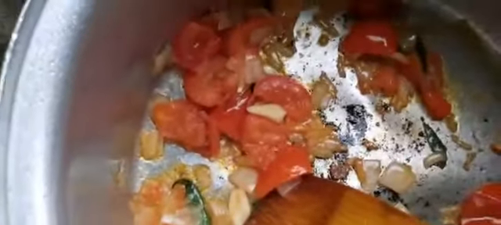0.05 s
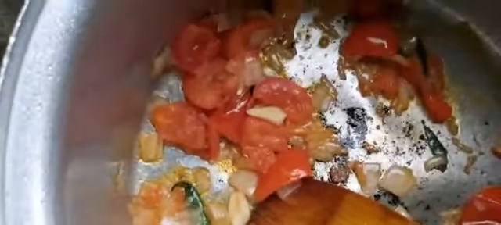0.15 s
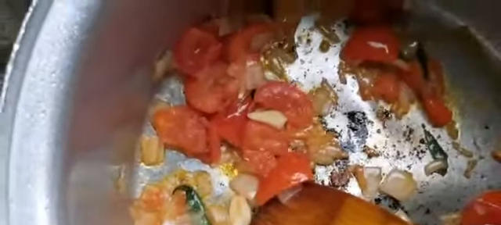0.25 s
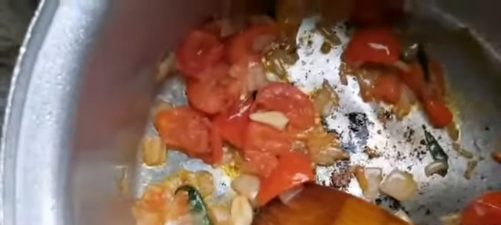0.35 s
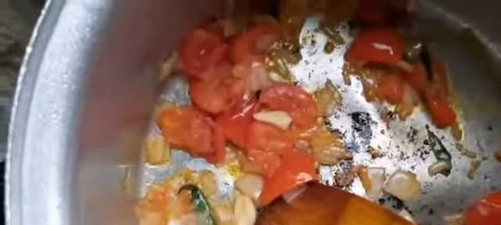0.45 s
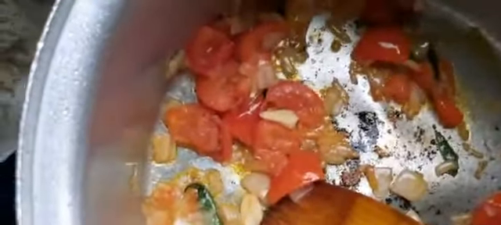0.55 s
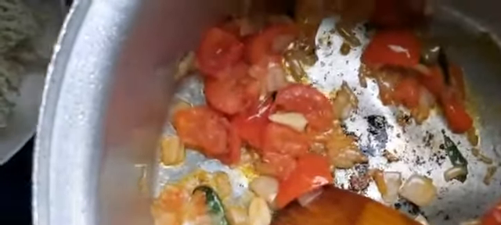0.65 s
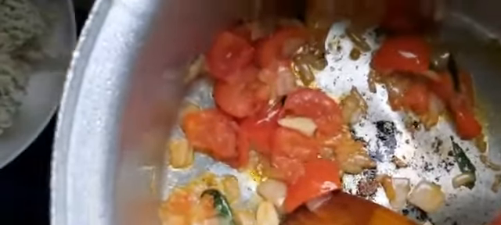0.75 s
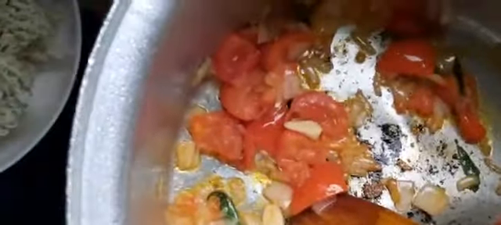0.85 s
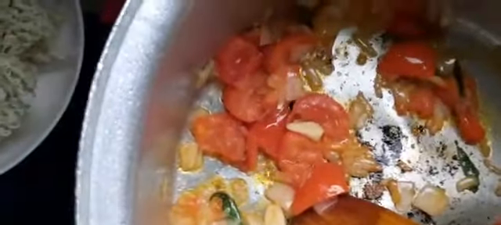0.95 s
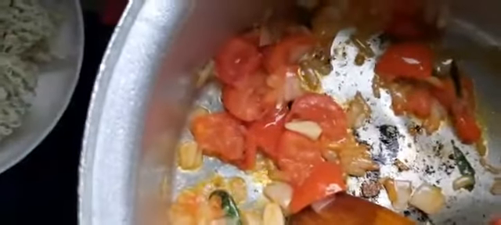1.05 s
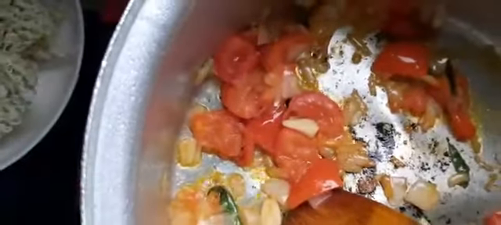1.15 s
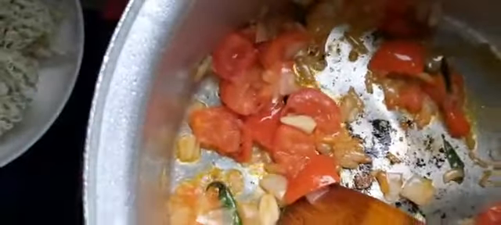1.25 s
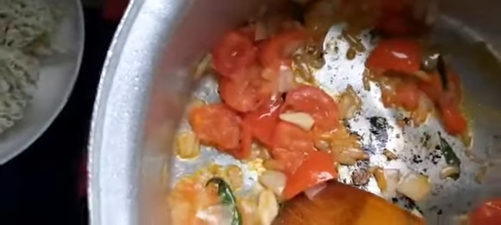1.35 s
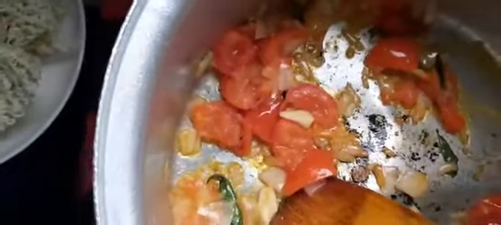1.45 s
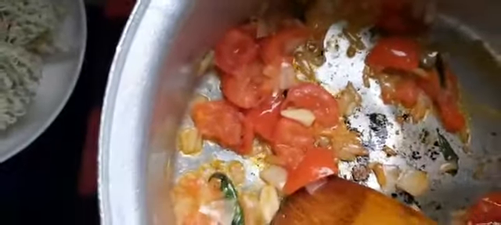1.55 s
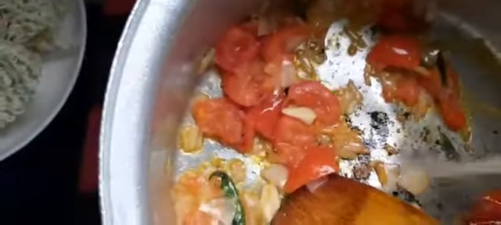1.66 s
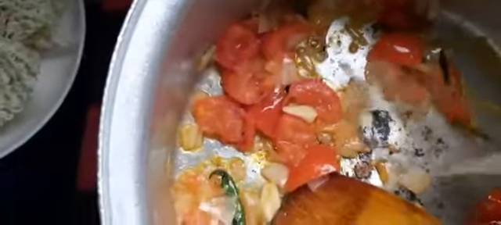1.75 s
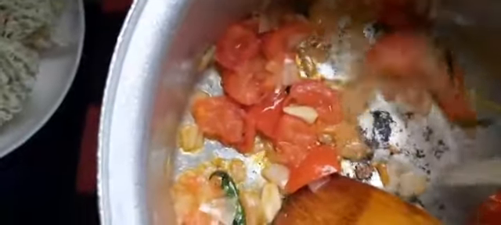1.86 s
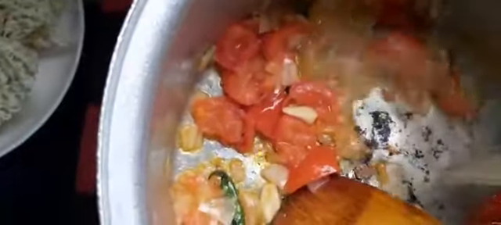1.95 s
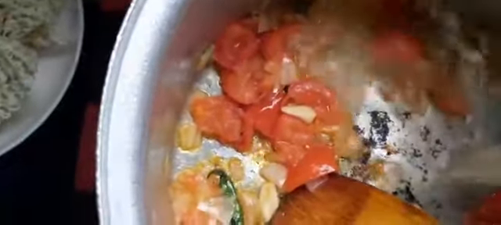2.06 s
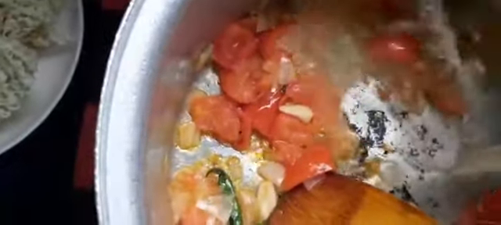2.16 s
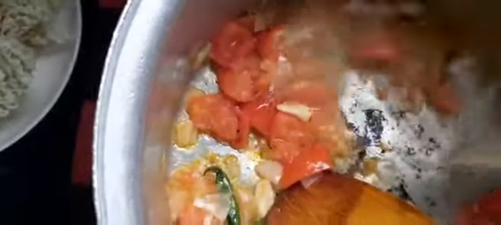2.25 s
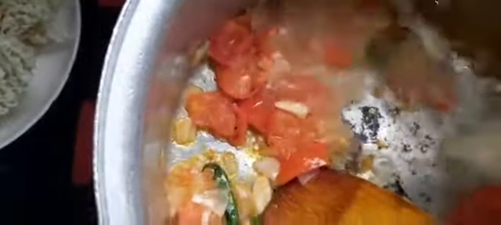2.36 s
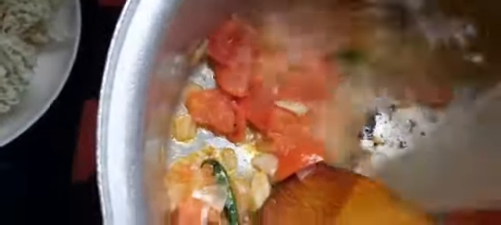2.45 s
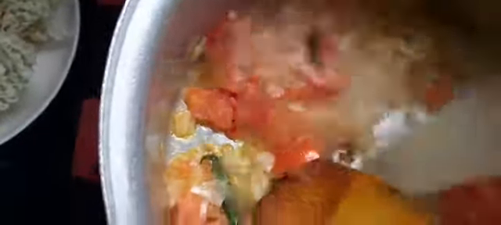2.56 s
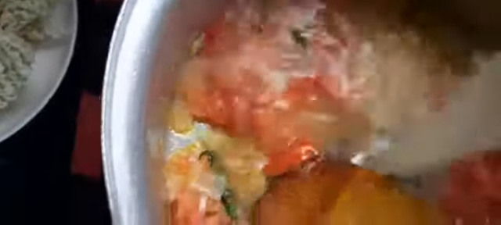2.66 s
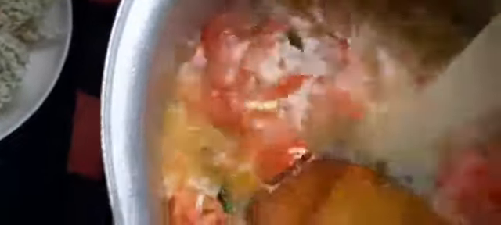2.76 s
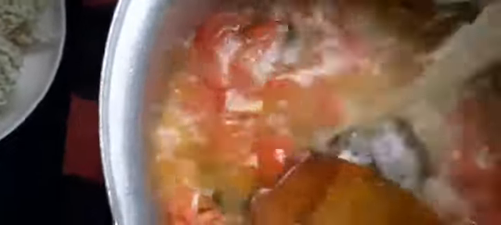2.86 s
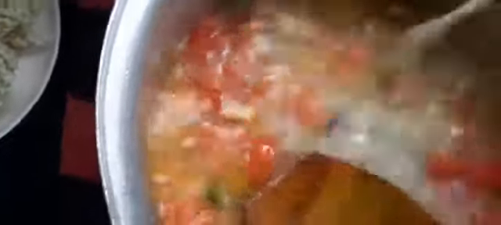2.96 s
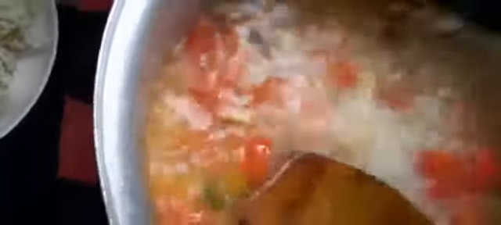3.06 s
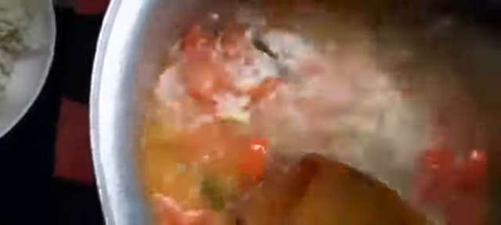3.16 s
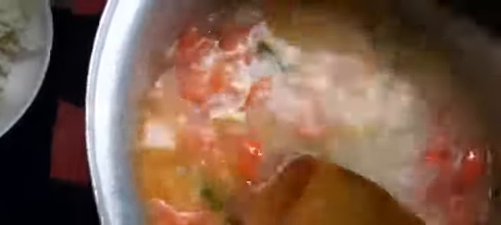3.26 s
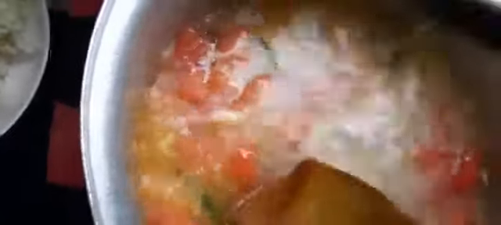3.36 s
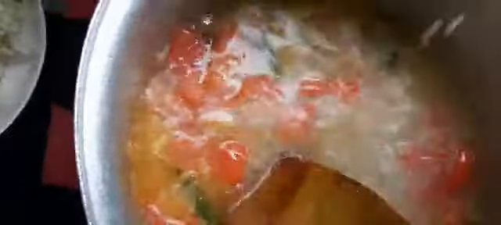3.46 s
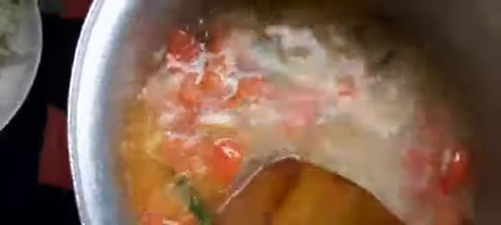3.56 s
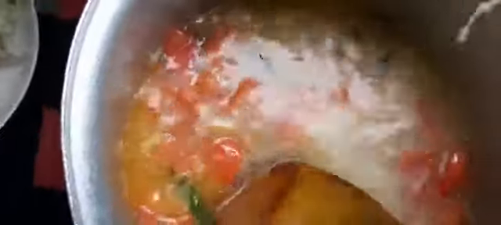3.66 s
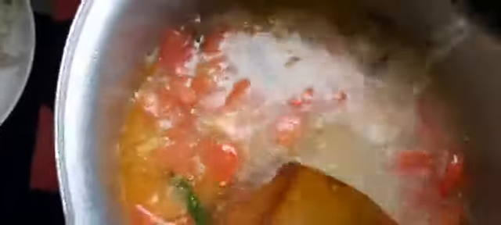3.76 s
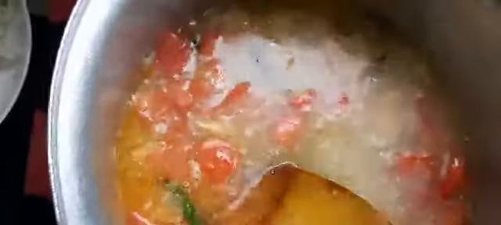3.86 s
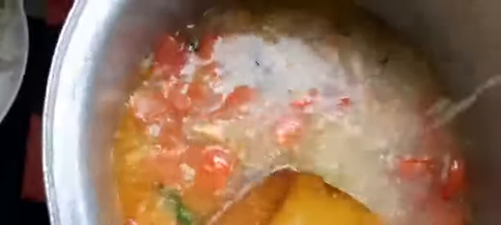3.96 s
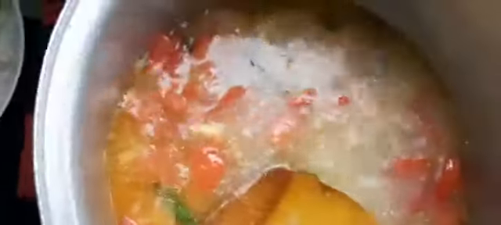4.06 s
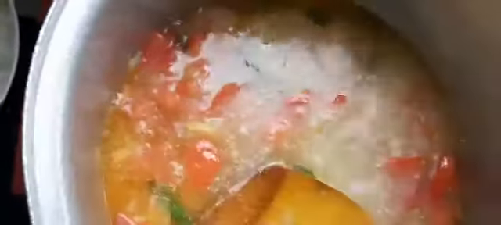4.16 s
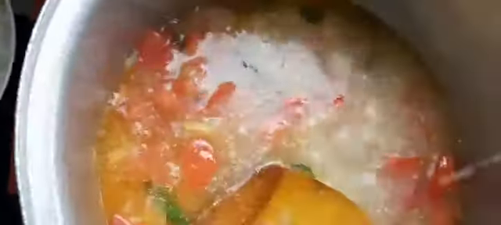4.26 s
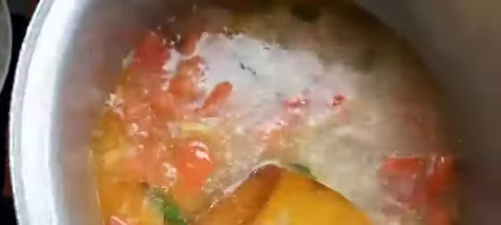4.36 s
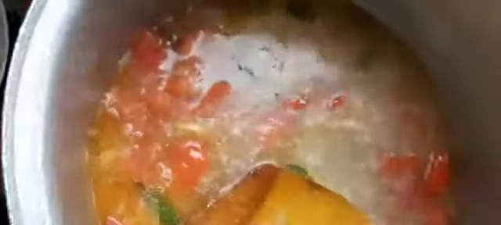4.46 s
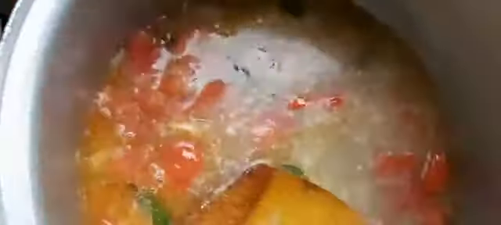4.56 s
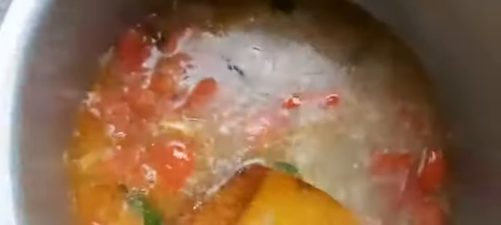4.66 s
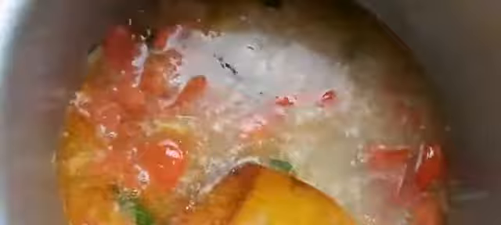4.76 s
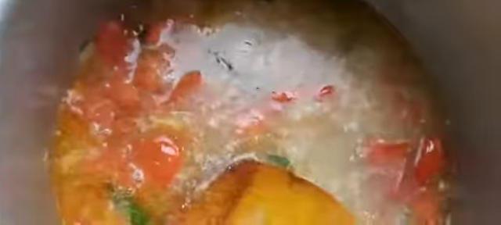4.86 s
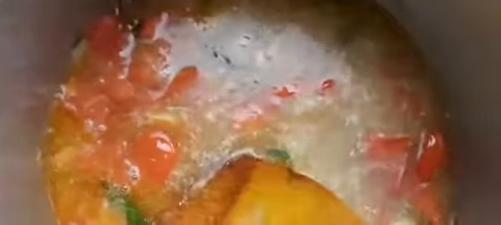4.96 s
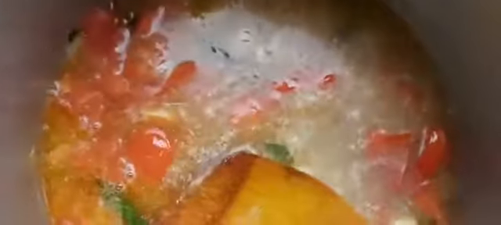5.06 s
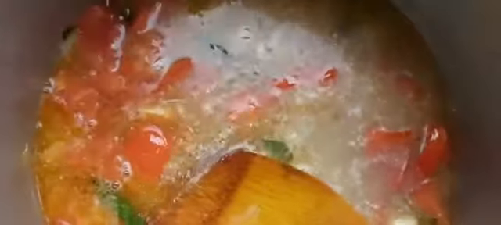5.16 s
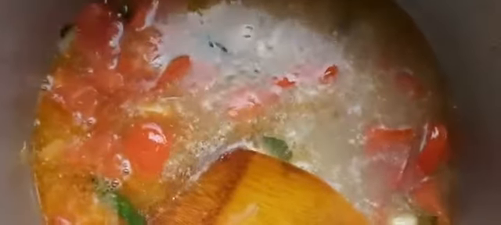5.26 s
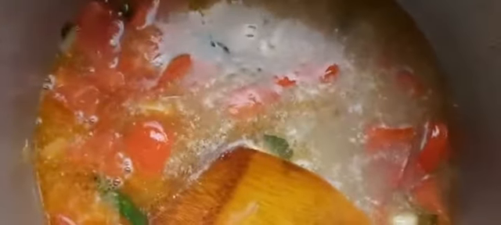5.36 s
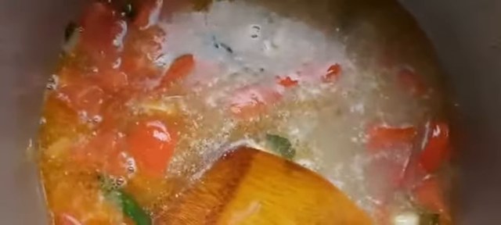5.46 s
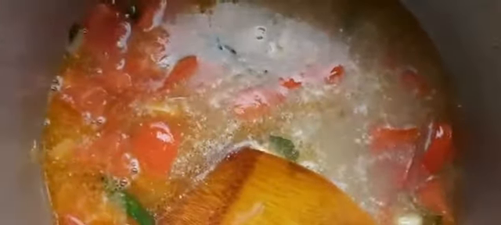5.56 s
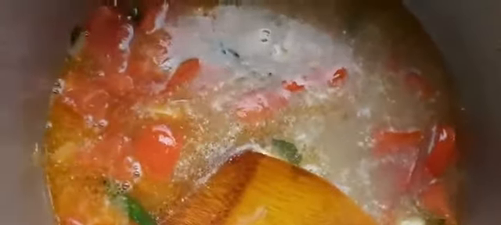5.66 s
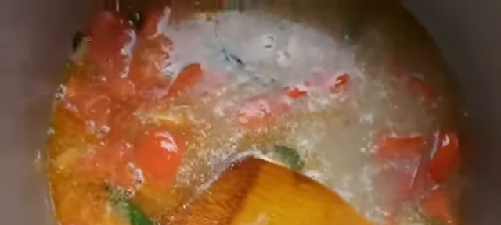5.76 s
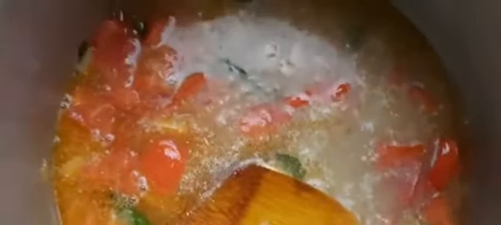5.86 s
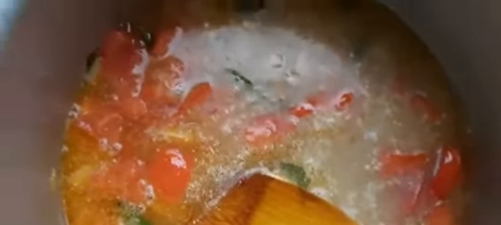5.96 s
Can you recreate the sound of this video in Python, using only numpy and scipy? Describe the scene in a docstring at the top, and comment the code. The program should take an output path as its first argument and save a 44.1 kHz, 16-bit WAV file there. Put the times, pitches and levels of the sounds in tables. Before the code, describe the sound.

Tomatoes and onions sizzle and crackle in a metal pot, then water splashes in with a hissing burst, gurgles, and falls nearly silent before a knock.

```python
"""Tomatoes and onions fry in oil in a metal pot, close to the microphone in a quiet kitchen.
Sizzle is thousands of tiny vapour bursts mixed with smooth steam noise; loud drops crack above it.
The first water flashes to steam with a thump; the pour, made of ringing bubbles and air pockets, splashes
and gurgles until it drowns the sizzle. A few last drops tick and steam squeaks on gliding tones;
the pot slips twice with a short groan and rings with a firm knock at the end."""
import sys
import numpy as np
from scipy import signal
from scipy.fft import rfft, irfft
from scipy.io import wavfile

SR = 44100
rng = np.random.default_rng(int(sys.argv[2]) if len(sys.argv) > 2 else 0)


def dump_mix(stems):
    """Bounce the given channels to the path in sys.argv[1] as a 16-bit WAV at rate SR."""
    frames = np.atleast_2d(stems).T  # one column per channel
    limited = np.clip(frames, -1, 1)  # hard clip at full scale
    pcm = np.round(limited * 32767).astype(np.int16)
    wavfile.write(sys.argv[1], SR, pcm)


N = 265526
TIME = np.arange(N) / SR  # seconds

# base level of the oil sizzle in dB, before the final balance
FRY_DB = -28
# seconds: the water drowns the bottom as the pour tails off; the lesser spits end
DROWN_S, SPITS_END_S = 2.78, 3.6
THUMP_S = 1.718  # the first water lands
# vapour bursts per second at frying strength, before they follow the vigour
BURSTS_PER_S = 4400
# which side is louder, left minus right in dB
OIL_LEFT_DB = 2.8


def from_db(db):
    """Turn decibels into a gain."""
    return 10 ** (np.asarray(db) / 20)


def power_sum(*levels_db):
    """Level in dB of unrelated sounds together: their powers add."""
    return 10 * np.log10(sum(from_db(db) ** 2 for db in levels_db) + 1e-20)


def rms_one(x):
    """Scale a sound to an rms of 1."""
    return x / np.sqrt(np.mean(x ** 2) + 1e-20)


def at_hz(points, hz):
    """Read a curve of (Hz, value) points along a log-frequency axis."""
    f, value = np.transpose(points)
    return np.interp(np.log(np.maximum(hz, 1)), np.log(f), value)


def pan(left_db):
    """Gains of left and right that differ by left_db."""
    return from_db(np.array([[left_db], [-left_db]]) / 2)


def add(out, s, sound):
    """Mix a short sound in at time s."""
    i = int(np.clip(round(s * SR), 0, N - 1))
    out[:, i:i + sound.shape[-1]] += sound[..., :N - i]


def drift(rate):
    """Smoothed noise with an rms of 1; a higher rate makes it wander faster."""
    step = 40  # samples between the values that are drawn
    r = np.exp(-2 * step * np.pi * rate / SR)
    noise = rng.standard_normal(N // step + 2002)
    slow = signal.lfilter([1], [1, -2 * r, r * r], noise)[2000:]
    return np.interp(np.arange(N) / step, np.arange(len(slow)), rms_one(slow))


def colour(x, spectrum, size=2048):
    """Filter to the given spectrum with unit power gain; minimum phase, so nothing sounds early."""
    bins_hz = np.arange(size // 2 + 1) * SR / size
    cepstrum = irfft(np.log(from_db(at_hz(spectrum, bins_hz))))
    cepstrum[1:size // 2] *= 2
    cepstrum[size // 2 + 1:] = 0
    kernel = irfft(np.exp(rfft(cepstrum)))
    return signal.oaconvolve(x, kernel[None] / np.linalg.norm(kernel), axes=1)[:, :N]


def resonate(x, hz, width_hz):
    """One resonance with gain 1 at its peak; a narrow one rings longer."""
    r = np.exp(-np.pi * width_hz / SR)
    top = np.array([1, 0, -1]) * (1 - r * r) / 2
    bottom = [1, -2 * r * np.cos(2 * np.pi * hz / SR), r * r]
    return signal.lfilter(top, bottom, x + 1e-18)


def pot_air(x, modes, low_hz, high_hz):
    """A group of air resonances, limited to a band of pitches; rms 1."""
    rings = 0
    for k, (hz, width, db) in enumerate(modes):
        rings = rings + (-1) ** k * from_db(db) * resonate(x, hz, width)
    band = signal.butter(2, [low_hz, high_hz], "band", fs=SR, output="sos")
    return rms_one(signal.sosfilt(band, rings))


def blend(x, likeness):
    """Make two unrelated channels alike (1), unrelated (0) or opposite (-1)."""
    c = np.clip(likeness, -1, 1)
    mid = np.sqrt(1 + c) * (x[0] + x[1]) / 2
    side = np.sqrt(1 - c) * (x[0] - x[1]) / 2
    return np.array([mid + side, mid - side])


def pot_walls(x, t60, wall_db, size=4096):
    """Dense, dying reflections between the walls of pot or kitchen, different in each channel."""
    t = np.arange(size) / SR
    echoes = rng.standard_normal((2, size)) * from_db(-60 * t / t60) * (t > .0006)
    echoes *= from_db(wall_db) / np.linalg.norm(echoes, axis=1, keepdims=True)
    return x + signal.oaconvolve(x, echoes, axes=1)[:, :N]


def bend(x, octaves):
    """Shift the pitch of a steady sound along a curve by reading it faster or slower."""
    where = np.cumsum(2 ** np.clip(octaves, -.5, .5)) % (N - 1)
    return np.array([np.interp(where, np.arange(N), channel) for channel in x])


def ebb(held_db, sag_s, sag_db_per_s, fall_db_per_s, remnant_db, fade_db_per_s):
    """A level holds, sags as the water deepens, then falls fast to a slowly fading remnant."""
    drowned = np.maximum(TIME - DROWN_S, 0)
    main_db = held_db - sag_db_per_s * np.maximum(TIME - sag_s, 0) - fall_db_per_s * drowned
    return power_sum(main_db, remnant_db - fade_db_per_s * drowned)


def swell(s, rise, t60):
    """A straight rise to 0 dB, then a steady decay of 60 dB per t60; in dB."""
    t = TIME - s
    return 20 * np.log10(np.clip(t / rise, 1e-9, 1)) - 60 * np.maximum(t - rise, 0) / t60


def swells(rows):
    """The two level curves in dB of a table of swells."""
    curves = []
    for s, rise, t60, *levels_db in rows:
        curves.append(swell(s, rise, t60) + np.array(levels_db)[:, None])
    return power_sum(*curves)


def chance(per_s):
    """Sample numbers of events that come at random at the given rate."""
    return np.flatnonzero(rng.random(N) < per_s / SR)


def random_clicks(happens, spread_db, cap):
    """Single-sample clicks of uneven size and random sign wherever an event happens."""
    sizes = from_db(spread_db * np.minimum(rng.exponential(1, N), cap))
    return sizes * rng.choice([-1, 1], N) * happens


def bursts(per_s, spread_db, width_hz, count=20, size=4):
    """Tiny vapour bursts; each spot has its pitch and stereo lag, each of four groups its echoes."""
    happens = rng.random(N) < per_s * from_db(2.0 * drift(25)) / SR
    clicks = random_clicks(happens, spread_db, cap=4.5) / np.sqrt(per_s)
    spot = rng.integers(0, count, N)
    quarters = np.zeros((size, 2, N))
    for k, hz in enumerate(np.linspace(700, 15500, count)):
        snap = resonate(clicks * (spot == k), hz, width_hz)
        lagged = np.roll(snap, rng.integers(-9, 10))
        quarters[k % size] += pan(rng.normal(0, 2.0)) * [snap, lagged]
    return rms_one(sum(pot_walls(quarter, t60=0.027, wall_db=-3.5) for quarter in quarters))


def sizzle(crackle, fizz, oil_db, fizz_db, flash_db, boil_db, steam_db):
    """Oil crackles on dry patches, water flashes off metal and fizzes below; smooth steam runs through."""
    # Each row of these four spectra: pitch in Hz, level in dB per Hz.
    # They colour the frying in oil, the fizz under water, the flash of steam and the boiling water.
    oil_sizzle = [(1800, -36.5), (2500, -10), (3300, -12), (4200, -3.5), (5200, -3), (6400, -2.5),
                  (8000, -3), (9900, -7.5), (11400, -1), (12700, 0.5), (14500, -2.5), (16000, -2.5)]
    wet_sizzle = [(1800, -30), (2600, -3.5), (3400, -1), (4800, -1), (6400, -4), (7500, -4.5),
                  (9900, -10.5), (11300, -6), (12600, -3.5), (14500, -8), (16000, -3)]
    flash_hiss = [(1800, -32), (2250, -5.5), (2800, -10.5), (3500, -18), (4100, -8.5), (5200, -6.5),
                  (6400, -4), (8100, 0), (9700, -3), (11400, -2.5), (12700, 3), (16000, -4)]
    boil_colour = [(1000, -34.5), (3300, -12), (4700, -5), (6200, -3), (8000, -6.5), (10000, -11),
                   (16000, -23)]
    steam = from_db(steam_db)
    share = 1 / np.sqrt(1 + steam ** 2)  # keeps the power of bursts and steam together steady
    vapour = steam * rng.standard_normal((2, N))
    oily = from_db(oil_db - 0.5) * pan(OIL_LEFT_DB) * colour(share * (crackle + vapour), oil_sizzle)
    wet = from_db(fizz_db - 1.0) * pan(1.6) * colour(share * (fizz + vapour), wet_sizzle)
    boil_steam = steam * rng.standard_normal((2, N))
    boil = from_db(boil_db) * colour(1.1 * share * (fizz + boil_steam), boil_colour)
    flash_steam = steam * rng.standard_normal((2, N))
    flash = colour(share * (crackle + flash_steam), flash_hiss)
    flash = from_db(flash_db) * pan(OIL_LEFT_DB) * flash
    flicker = from_db(1 * drift(13))
    return flicker * (oily + wet) + flash + boil


def frying_in_air(crackle, high_db, low_db):
    """The air in the pot rings with the frying; sloshes lift its high and low parts."""
    # The frying heard through the air of the dry pot. Each row: pitch in Hz, level in dB per Hz.
    dry_high = [(700, -29), (950, -8), (1180, -1.5), (1480, -7.5), (1750, 0.36), (1950, -5), (2080, -3.5),
                (2230, -0.5), (2450, -2), (2900, -5.5), (3400, -13), (4400, -32.5)]
    # Low air resonances of the dry pot. Each row: pitch in Hz, width in Hz, level in dB.
    dry_low = [(333, 36, 2), (445, 86, 4), (560, 490, -0.5), (860, 260, -16)]
    seethe = crackle + from_db(-1.5) * rng.standard_normal((2, N))
    high = rms_one(colour(blend(seethe, 0.22), dry_high)) * pan(4.4)
    low = pot_air(blend(seethe, 0.91), dry_low, 180, 1100) * pan(2.4)
    return from_db(power_sum(-37, high_db)) * high + from_db(power_sum(-45, low_db)) * low


def kitchen(cover):
    """Room rumble, hum, whine and hiss; a low flutter swells three times and weakens as water covers."""
    # Spectrum of the room. Each row: pitch in Hz, level in dB per Hz.
    room_spectrum = [(15, -47.5), (25, -9), (86, -9), (119, -6.5), (183, -4), (202, -20.5), (233, -5),
                     (258, -12), (329, -5.5), (456, -6), (631, -18.5), (727, -15.5), (1230, -23.5),
                     (1540, -21), (3200, -46.5), (4160, -67), (7040, -120)]
    # How alike left and right are in the room. Each row: pitch in Hz, likeness from -1 to 1.
    room_likeness = [(60, 0.65), (180, 0.91), (550, 0.64), (1650, -0.53), (4970, -0.19), (15000, -0.25)]
    # Spectrum of the microphone hiss. Each row: pitch in Hz, level in dB per Hz.
    mic_hiss = [(2500, -6), (3300, -4.5), (3700, 0.5), (4200, -5), (5200, -8.5), (6200, 3.5), (7000, -6),
                (8800, -3.5), (10000, -5), (16000, -4.5)]
    hz = np.arange(N // 2 + 1) * SR / N
    air = blend(rfft(rng.standard_normal((2, N))), at_hz(room_likeness, hz))
    room = rms_one(irfft(air * from_db(at_hz(room_spectrum, hz)), N))
    room = room * from_db(-61.5 + 1.1 * drift(11))
    room = signal.sosfilt(signal.butter(3, 38, "high", fs=SR, output="sos"), room)
    hum_hz = 118 + 2.0 * drift(5.76)
    hum = from_db(-72.0 + 2.5 * drift(4.38)) * np.sin(2 * np.pi * np.cumsum(hum_hz) / SR)
    whine_hz = 3677 + 14 * drift(70)
    whine = from_db(-94.5 + 2.3 * drift(4)) * np.sin(2 * np.pi * np.cumsum(whine_hz) / SR)
    hiss = from_db(-80.0) * colour(rng.standard_normal((2, N)), mic_hiss)
    flutter_modes = [(55, 43, -9.5), (116, 28, 1.5), (192, 140, -5.0)]  # Hz, width in Hz, dB
    flutter = pot_air(blend(rng.standard_normal((2, N)), 0.93), flutter_modes, 35, 290)
    at_first_db = -41 + swell(0, 0.008, 0.5)
    after_thump_db = -55 + swell(THUMP_S, 0.025, .6)
    under_pour_db = -54 + swell(1.8, .45, 2.2)
    flutter_db = power_sum(-58.5, at_first_db, after_thump_db, under_pour_db)
    flutter = from_db(flutter_db) * (1 - 0.63 * cover) * flutter
    return pan(2.3) * (room + hum + whine + hiss + flutter)


def lesser_spits(heat_db, cover):
    """Random small spits until the pot has cooled; most are high, the more so under water."""
    oil_per_s, wet_per_s = 5, 60
    per_s = (oil_per_s * (1 - cover) + wet_per_s * cover) * (TIME < SPITS_END_S)
    rows = []
    for i in chance(per_s):
        # the level follows half of the sizzle's rise and fall
        db = -18.5 + 0.5 * (heat_db[i] - FRY_DB) + rng.normal(0, 0.8)
        octaves_down = rng.random() ** 2 * (0.8 - 0.74 * cover[i])
        rows.append((i / SR, db, 13800 / 2 ** octaves_down, rng.normal(5, 4)))
    return rows


def spits(heat_db, cover, size=1400):
    """A drop bursts in a crack of a few cycles, then a short spray; low drops burst more softly."""
    # The loudest drops spitting and ticking.
    # Each row: start in seconds, level in dB before softening, pitch in Hz, left minus right in dB.
    big_spits = [(0.0655, -10, 6260, -4), (0.1292, -15, 2660, 9), (0.1384, -10.5, 9260, 9),
                 (0.2575, -13, 6300, -2), (0.267, -2, 14300, 8), (0.2768, -14, 2600, 2),
                 (0.2835, -8, 12700, 16), (0.5057, -9, 8350, 2), (0.555, -14, 5650, 4),
                 (0.6046, -18, 2300, 0), (0.6561, -4, 6500, -1), (0.6828, -21, 2400, 3),
                 (0.6946, -22, 2830, -3), (0.7156, -22, 2950, -4), (0.731, -18, 4080, -6),
                 (0.7377, -29, 2550, -4), (0.7665, -11, 9000, 3), (0.8619, -12, 13400, 6),
                 (0.9346, -21, 6150, -6), (1.012, -20, 12700, -3), (1.257, -5.5, 13100, 5),
                 (1.3687, -9, 12800, 7), (1.582, -11, 12500, 6.5), (1.9275, -21, 12900, 0),
                 (2.1286, -11, 12900, 4), (2.7706, -14, 4930, -9), (2.8312, -20, 12000, 4),
                 (2.8332, -16.5, 4730, 8), (2.8635, -27, 6760, 4), (2.9757, -26.5, 4540, 10),
                 (3.0139, -21.5, 4400, 14), (3.0185, -25, 4340, 12), (3.0565, -35, 7220, 8),
                 (3.1034, -32, 11900, 9), (3.1084, -40.5, 3970, 14), (3.1283, -31, 14300, 11),
                 (3.1517, -28.5, 7800, 14), (3.2161, -37, 12100, 10), (3.2416, -40, 15000, 10),
                 (3.2575, -38, 5250, 4), (3.2862, -34.5, 12500, 12), (3.3084, -41, 12800, 6),
                 (3.3598, -42, 12000, 11), (3.377, -37, 13600, 14), (3.391, -48, 13050, 8),
                 (3.435, -47, 7900, 13), (3.5015, -49.5, 8490, 16), (3.5392, -40, 13200, 11),
                 (3.5733, -42, 12300, 10.5), (3.835, -53, 9520, 8), (3.8435, -38.5, 9550, 15),
                 (3.923, -45, 12440, 5), (4.0711, -43.5, 11100, 6), (4.337, -52, 7800, 9.5),
                 (4.3765, -42.5, 11200, 2.5), (4.5543, -56, 9450, 8), (4.8, -60, 7000, 5),
                 (5.0422, -51.5, 4380, -5.5), (5.0742, -49, 8740, 0), (5.0858, -57, 4260, -0.5),
                 (5.0865, -61, 7960, 0), (5.1187, -46, 4390, -4)]
    out, t = np.zeros((2, N)), np.arange(size) / SR
    for s, db, hz, left_db in list(big_spits) + lesser_spits(heat_db, cover):
        late = np.maximum(t - rng.uniform(0, .00004, (2, 1)), 0)  # tiny delay in each channel
        crack = np.sin(2 * np.pi * hz * late)
        crack = crack * from_db(-60 * late * hz / 16) * (1 - np.exp(-late * hz / 2))
        spray = rms_one(resonate(rng.standard_normal((2, size)), hz, .45 * hz))
        spray = spray * from_db(-12.5 - 60 * t / .028)
        softness = from_db(2.0 * np.log2(hz / 13000))
        drop = crack / np.abs(crack).max() + spray
        add(out, s, from_db(db - 4.0) * softness * pan(left_db) * drop)
    return out


def sputters():
    """A wet patch boils off in a ragged run of noise that starts fast and dies away."""
    # Ragged little runs of bursts. Each row: start in seconds, time to fall by 18 dB in seconds,
    # level in dB before the raggedness, pitch in Hz, left minus right in dB.
    runs = [(0.122, 0.051, -30, 2920, -3), (0.681, .06, -36.5, 2900, -6), (0.733, .015, -36, 4200, -3),
            (2.39, .012, -27, 7500, 0), (2.831, .016, -28.5, 4900, 2), (2.859, 0.021, -35, 6500, 3),
            (2.959, .025, -43, 12500, 10), (2.968, .04, -42.5, 7160, 6), (2.993, 0.055, -43, 6800, 5),
            (3.012, 0.021, -40, 4400, 10), (3.05, .05, -69, 4500, 5), (3.073, 0.033, -51, 12000, 10),
            (3.104, 0.039, -51, 4150, 9), (3.146, .022, -50, 7900, 12), (3.191, .015, -54, 6000, 6),
            (3.258, 0.013, -53.5, 5000, 5), (3.372, .025, -60, 13000, 10)]
    out, t = np.zeros((2, N)), np.arange(SR // 8) / SR
    ragged = from_db(4.5 * drift(150))
    for s, length, db, hz, left_db in runs:
        fizz = rms_one(resonate(rng.standard_normal((2, len(t))), hz, .3 * hz))
        rise = np.minimum(t / .003, 1)
        add(out, s, pan(left_db) * from_db(db - 18 * t / length) * rise * fizz)
    return ragged * out


def tones(rows, unsteady, flicker_db):
    """Tones that each swell and fade on an unsteady, curved glide of pitch."""
    out = np.zeros((2, N))
    waver = 1 + unsteady * drift(300)
    flicker = from_db(flicker_db * drift(45))
    for s, length, *pitches_hz, db in rows:
        along = np.linspace(0, 1, int(length * SR))
        hz = np.polyval(np.polyfit([0, .5, 1], pitches_hz, 2), along)
        phase = 2 * np.pi * np.cumsum(hz * waver[:len(along)]) / SR
        add(out, s, pan(3.0) * from_db(db) * np.sin(np.pi * along) * np.sin(phase))
    return flicker * out


def groans():
    """The pot slips on its stand and groans: several gliding tones sound nearly at once."""
    # One row per tone. Each row: start in seconds, length in seconds,
    # pitch in Hz at start, middle and end, level in dB before the flicker.
    groan_tones = [(0.553, .075, 410, 450, 400, -32), (0.555, .075, 290, 310, 320, -43),
                   (0.55, .1, 1710, 1755, 1775, -42), (5.331, .055, 440, 465, 470, -55),
                   (5.331, .055, 310, 322, 330, -59), (5.336, .06, 705, 713, 715, -67),
                   (5.34, .07, 1500, 1512, 1525, -79), (5.335, .06, 3400, 3410, 3420, -84)]
    return tones(groan_tones, unsteady=.011, flicker_db=1.3)


def pocket(hz, t60, rise, left_db, size=8192):
    """An air pocket swells, rings and rises a little in pitch; the quieter side hears it later."""
    lag_s_per_db = .00003
    lag = np.maximum([[-left_db], [left_db]], 0) * lag_s_per_db
    t = np.maximum(np.arange(size) / SR - lag, 0)
    envelope = from_db(-60 * t / t60) * (1 - np.exp(-t / rise))
    return pan(left_db) * envelope * np.sin(2 * np.pi * hz * t * (1 + 0.095 * t / t60))


def lesser_plops(splash_db, cover):
    """Random small air pockets while the water runs, as strong as the splash that traps them."""
    per_s = 16 * cover * (TIME < DROWN_S + .3)
    rows = []
    for i in chance(per_s):
        db = splash_db[i] - 0.5 + rng.normal(0, 2.3)
        hz = 2300 / 2 ** (1.2 * rng.random())
        rows.append((i / SR, db, hz, 0.0013, rng.normal(7, 3.0)))
    return rows


def plops(splash_db, cover):
    """The thump of the first water and the ringing air pockets, echoing in the pot."""
    # The thump's tones. Each row: pitch in Hz, level in dB, time to die by 60 dB in seconds.
    thump_tones = [(327.8, -25, 0.24), (450, -8.5, 0.046), (820, -14.5, 0.021)]
    # The largest air pockets. Each row: start in seconds, level in dB before its rise and decay,
    # starting pitch in Hz, rise in seconds, left minus right in dB.
    big_plops = [(1.775, -16, 2370, .001, 6), (1.785, -28, 348, .002, 2), (1.809, -24, 344, .002, -2),
                 (1.818, -28, 1660, .002, 1), (1.838, -18, 2250, 0.0037, 5), (2.265, -25.5, 746, .001, 1),
                 (2.352, -25, 320, .003, -3), (2.378, -26, 332, .003, -1), (2.445, -32, 328, .003, -1),
                 (2.613, -25, 1240, .002, 10), (2.805, -26, 1685, .0015, 5), (2.828, -24, 2050, .0015, 3),
                 (2.836, -33, 286, .003, 0), (2.872, -36, 2100, .002, 7), (2.916, -33, 2250, .0015, 5),
                 (2.978, -31, 1840, .0015, 3), (3.258, -50, 1740, .0005, 7),
                 (2.281, -16.5, 1910, 0.0017, 10), (2.293, -21.5, 1130, 0.0016, 20.5),
                 (2.368, -25.5, 660, 0.00029, -2.5), (2.449, -25, 1734, 0.00092, 5),
                 (2.532, -13, 1572, 0.0012, 15.5), (2.592, -21.5, 1077, 0.006, 17.5),
                 (2.632, -24, 1910, 0.0016, 13.5), (2.744, -25, 2150, 0.0012, 12.5),
                 (2.796, -21, 5730, 0.00081, 1), (2.935, -31.5, 856, 0.0024, 0),
                 (2.96, -25.5, 2010, 0.0019, 3.5), (2.998, -24.5, 1680, .0012, 1),
                 (3.138, -25, 604, 0.0015, 5), (3.162, -39, 640, .002, -1), (3.136, -37.5, 874, 0.00027, 2),
                 (3.721, -52.5, 510, .0004, 3.5)]
    out = np.zeros((2, N))
    for hz, db, t60 in thump_tones:
        add(out, THUMP_S, from_db(db) * pocket(hz, t60, rise=0.00084, left_db=2.3))
    for s, db, hz, rise, left_db in big_plops + lesser_plops(splash_db, cover):
        t60 = 0.042 * (1000 / hz) ** 0.15  # high pockets ring shorter
        add(out, s, from_db(db) * pocket(hz, t60, rise, left_db))
    out = signal.sosfilt(signal.butter(1, 170, "high", fs=SR, output="sos"), out + 1e-18)
    return pot_walls(out, t60=0.12, wall_db=-13)


def bubbles(per_s, low_hz, high_hz, cycles, spread_db, count=40):
    """Air bubbles beaten into the water, each ringing for about this many cycles."""
    clicks = random_clicks(rng.random(N) < per_s / SR, spread_db, cap=3.5)
    dealt, out = rng.integers(0, count, N), np.zeros((2, N))
    for k, hz in enumerate(np.geomspace(low_hz, high_hz, count)):
        ring = resonate(clicks * (dealt == k), hz, 2.2 * hz / cycles)
        out += pan(rng.normal(0, 2.5)) * ring
    return rms_one(pot_walls(out, t60=.03, wall_db=0))


def pour(splash_db, gurgle_db, high_db, low_db):
    """Bubbles ring the air of the pot as splash and gurgle; the gurgle sinks as the pot fills."""
    # Upper, then lower air resonances with water in the pot.
    # Each row: pitch in Hz before bending, width in Hz, level in dB.
    wet_high = [(1130, 200, -4.5), (1612, 346, -2.5), (1730, 220, 0), (1971, 240, -1.5), (2250, 810, -5.5)]
    wet_low = [(285, 50, 1), (487, 610, -1.5), (665.4, 506, 0.5), (882, 64, -5.5)]
    splash = bubbles(1900, 857, 2800, cycles=18, spread_db=3.4)
    splash = pot_air(splash, wet_high, 1100, 2600) * pan(5.2)
    splash = bend(splash, .045 * drift(9))  # octaves of wander with the sloshing
    gurgle = blend(bubbles(900, 240, 1040, cycles=6.7, spread_db=-0.5), 0.6)
    gurgle = pot_air(gurgle, wet_low, 200, 1100) * pan(0.8)
    half_full_s, sink_octaves_per_s = 2.62, .42
    sink = sink_octaves_per_s * np.clip(half_full_s - TIME, -.3, .4)
    gurgle = bend(gurgle, sink + .03 * drift(7))
    splash = from_db(power_sum(splash_db, high_db)) * splash
    return splash + from_db(power_sum(gurgle_db, low_db)) * gurgle


def squeaks():
    """Steam squeaks out from under the food as high, flickering, gliding tones."""
    # Each row: start in seconds, length in seconds, pitch in Hz at start, middle and end,
    # level in dB before the flicker.
    squeak_tones = [(3.955, 0.052, 12700, 13200, 13300, -68), (4.015, 0.07, 13150, 13000, 12800, -72.5),
                    (4.095, 0.15, 14340, 14220, 13750, -75.5), (4.225, 0.08, 13800, 13250, 12340, -75)]
    return tones(squeak_tones, unsteady=.008, flicker_db=3.5)


def knocks(size=16384):
    """A padded contact: the pot's tones swell over a few milliseconds above a short rattle."""
    # Each row: start in seconds, level in dB added to every tone.
    hits = [(5.948, -23)]
    # The knocked pot's tones. Each row: pitch in Hz, level in dB relative to the knock,
    # time to die by 60 dB in seconds, rise in seconds.
    pot_tones = [(119.3, -20.5, 0.47, 0.016), (341, 0.5, 0.25, 0.017), (417, 0.5, 0.25, 0.014),
                 (513, -18, 0.2, 0.012), (730, -26, 0.31, 0.0036), (885, -26, 0.29, 0.0045),
                 (1280, -23.5, 0.79, 0.011), (1850, -4, 0.19, 0.0046), (2000, -13, 0.2, .004),
                 (2120, -13, 0.23, 0.0054), (2603, -30, 0.25, 0.0029), (2960, -33, 0.36, .003),
                 (3553, -34.5, 0.9, 0.01), (4640, -45, 0.11, .002), (5370, -40, 0.3, .002),
                 (5700, -37, 0.26, .002), (6700, -39, 0.3, .002), (6918, -41, 0.3, .002),
                 (8600, -32, 0.072, 0.00093)]
    # The short rattle under a knock. Each row: pitch in Hz, level in dB per Hz.
    rattle_colour = [(40, -26), (120, -4), (220, -2), (400, 8.5), (900, -12), (1350, -11), (2000, 0.5),
                     (3200, -25), (4500, -33), (9000, -32), (16000, -43)]
    out, rattle, t = np.zeros((2, N)), np.zeros((2, N)), np.arange(size) / SR
    for s, knock_db in hits:
        for hz, db, t60, rise in pot_tones:
            ring = from_db(knock_db + db - 60 * t / t60) * (1 - np.exp(-t / rise))
            lag = rng.normal(0, .08, (2, 1)) / max(hz, 1000)
            add(out, s, ring * np.sin(2 * np.pi * hz * (t + lag)))
        noise = blend(rng.standard_normal((2, size)), 0.26)
        add(rattle, s, noise * from_db(knock_db - 16.0 - 60 * t / 1.3))
    return pan(1.9) * (out + colour(rattle, rattle_colour))


def scene():
    """As water covers the bottom, oil crackle gives way to fizz; the pour drives splash and gurgle."""
    # How oil, fizz, splash and gurgle ebb. Each holds: held level in dB, start of sag in seconds,
    # sag in dB per second, extra fall once drowned in dB per second, remnant in dB,
    # fade of the remnant in dB per second. Levels come before the final balance.
    oil_ebb = (FRY_DB, 1.82, 20, 57, -68.5, 17)
    fizz_ebb = (-29.5, 2, 11.5, 53, -77, 6)
    splash_ebb = (-30.5, 1.5, 7, 54, -77.5, 2)
    gurgle_ebb = (-40.5, 2.5, 21.5, 16, -72, 1)
    # Water meets hot metal and boils up, first in one big flash. Each row: start in seconds,
    # rise in seconds, time to die by 60 dB in seconds, hiss level in dB, boil level in dB.
    surges = [(1.686, 0.011, 0.51, -14.5, -25), (1.94, 0.15, .5, -41.5, -29.5),
              (2.45, 0.084, 1.1, -47, -38), (2.73, 0.079, 0.11, -45, -37),
              (3.19, 0.051, 0.57, -59.5, -81.5), (3.7, 0.3, 2.1, -74, -86.5), (4.56, .03, .6, -77, -95),
              (5.05, .07, .55, -77.5, -73.5)]
    # The water sloshes. Each row: start in seconds, rise in seconds,
    # time to die by 60 dB in seconds, splash level in dB, gurgle level in dB.
    sloshes = [(1.715, 0.035, 1.04, -29.5, -40), (1.77, .05, 0.41, -38.5, -38), (2.15, .13, 0.27, -32, -51),
               (2.73, 0.081, 0.11, -37, -50), (2.93, 0.032, 0.2, -40.5, -65),
               (3.68, 0.055, 2, -78.5, -67.5)]

    # the water spreads over the bottom: 0 is dry, 1 is covered
    spread_s, spread_takes_s = 1.78, 0.79
    spread = np.clip((TIME - spread_s) / spread_takes_s, 0, 1)
    cover = np.sin(np.pi / 2 * spread) ** 2
    oil_db, splash_db, gurgle_db = ebb(*oil_ebb), ebb(*splash_ebb), ebb(*gurgle_ebb)
    fizz_db = ebb(*fizz_ebb) + 10 * np.log10(cover + 1e-9)
    heat_db = power_sum(oil_db, fizz_db)
    surge_db, boil_db = swells(surges)
    vigour_db = power_sum(heat_db, surge_db, boil_db) - FRY_DB

    # smooth steam against the bursts: more under water, in a surge and once the fizz has settled
    settled = np.clip((TIME - SPITS_END_S) / .3, 0, 1)
    surge_lift_db = power_sum(heat_db, surge_db) - heat_db
    steam_db = -0.5 + 1.5 * cover + 9 * settled + 0.55 * surge_lift_db

    # bursts come faster when the pot is livelier; under water they ring longer
    crackle = bursts(BURSTS_PER_S * from_db(0.37 * vigour_db), spread_db=3.5, width_hz=2700)
    fizz = bursts(BURSTS_PER_S * from_db(vigour_db), spread_db=0.45, width_hz=420, count=40)
    pot = sizzle(crackle, fizz, oil_db, fizz_db, surge_db, boil_db, steam_db)
    high_db, low_db = swells(sloshes)
    pot += np.sqrt(1 - cover) * frying_in_air(crackle, high_db, low_db)
    pot += np.sqrt(cover) * pour(splash_db, gurgle_db, high_db, low_db)

    # the kitchen answers the drops and pockets
    drops = spits(heat_db, cover) + sputters() + plops(splash_db, cover)
    drops = pot_walls(drops, t60=.35, wall_db=-14, size=16384)
    return pot + drops + knocks() + squeaks() + groans() + kitchen(cover)


def record(dry):
    """Cut the top steeply above 15900 Hz."""
    return signal.sosfilt(signal.ellip(12, .1, 80, 15900, fs=SR, output="sos"), dry)


dry = scene()
out = record(dry)
dump_mix(out)
```